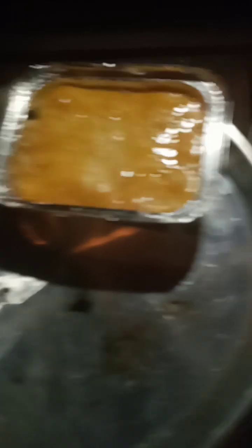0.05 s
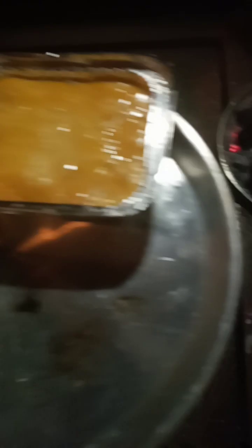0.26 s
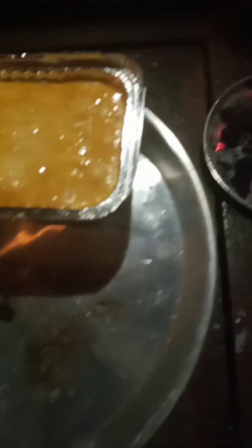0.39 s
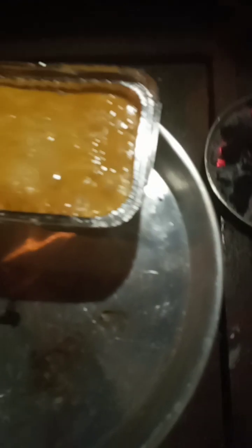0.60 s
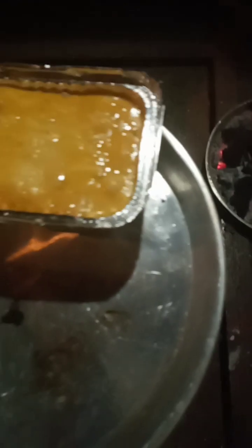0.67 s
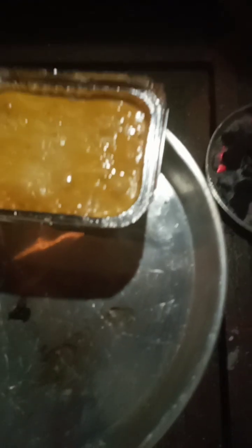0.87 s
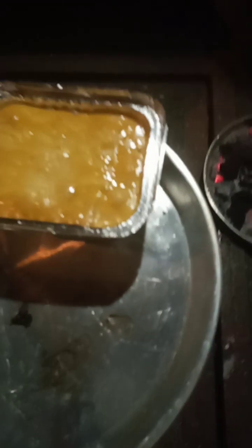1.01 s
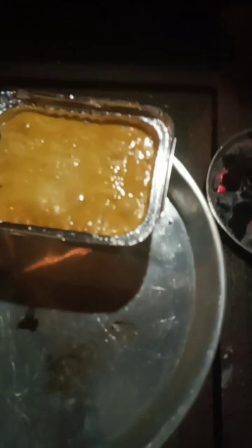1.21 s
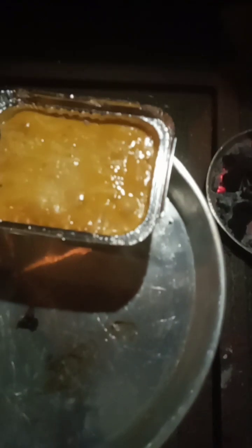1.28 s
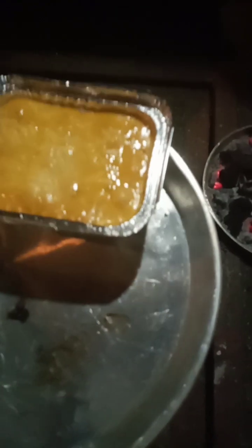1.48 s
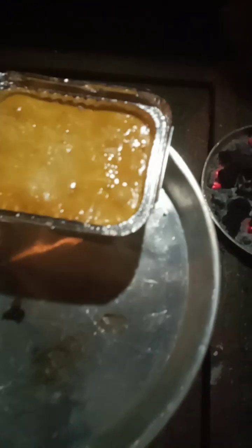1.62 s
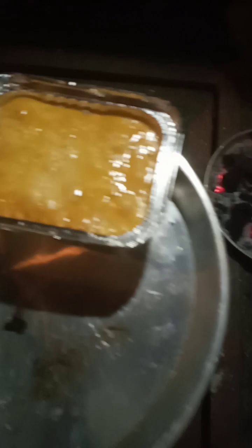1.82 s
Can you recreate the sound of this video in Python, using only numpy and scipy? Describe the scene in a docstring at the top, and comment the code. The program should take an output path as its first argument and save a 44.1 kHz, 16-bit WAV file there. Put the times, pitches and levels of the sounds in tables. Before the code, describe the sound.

Close up in a quiet room, a metal utensil clinks, rings and settles with a thud on a metal tray. Tiny foil ticks follow, then a damped double clack on the tray and faint squeaks over a low rumble.

```python
"""Utensil dropped on a steel tray.

A metal utensil clinks, lands with a thud and chatters to rest; each blow feeds its ringing modes.
Two damped knocks on the tray follow, a duller clack made of decaying noise bands. A foil dish ticks,
slides and rustles. Faint squeaks and hums sound over the low rumble of a quiet room."""
import sys
import numpy as np
from scipy import signal
from scipy.fft import rfft, irfft
from scipy.io import wavfile

SR = 44100
rng = np.random.default_rng(int(sys.argv[2]) if len(sys.argv) > 2 else 0)


def wrap_up_sound(samples):
    """Save the sound to the file named by the first command line argument, as 16-bit audio."""
    columns = np.atleast_2d(samples).T
    # keep every value between -1 and 1, then stretch to whole-number steps
    tamed = np.clip(columns, -1, 1)
    steps = np.round(tamed * 32767).astype(np.int16)
    wavfile.write(sys.argv[1], SR, steps)


N = 81585
T = np.arange(N) / SR
HZ = np.maximum(np.fft.rfftfreq(N, 1 / SR), 1)

# Utensil strikes. Each row: start in seconds, ring level in dB, clash level in dB.
STRIKES = [(.2062, -5.5, -22), (.2585, -5.5, -23.5), (.297, -5.5, -25.5), (.318, -28, -51)]
# Ringing modes of the metal. Each row: frequency in Hz, relative level in dB.
METAL_MODES = [(1519, -13), (1908, 1), (1998, -12), (2094, -4), (2196, -3), (2665, -15), (3068, -4),
               (3164, -13), (3597, -7), (4274, -8), (4393, -12), (4597, -13), (5098, -15), (5216, -15),
               (5556, -14), (5884, -17), (6035, -17), (6294, -4), (6950, -14), (7525, -12), (7962, -10),
               (8263, -20), (9030, -22), (10130, -25), (10865, -23), (15380, -15)]
# Weight landing on the tray. Each row: start in seconds, level in dB.
THUDS = [(0.316, -17.5), (0.347, -32.5), (0.38, -32.5), (1.305, -54)]
# Tray knocks. Each row: start in seconds, level in dB, tilt in dB per octave, crack level in dB.
KNOCKS = [(0.8811, -30, -1, -48), (0.9223, -19, 0.5, -26)]
# Foil ticks. Each row: start in seconds, level in dB.
TICKS = [(.058, -58), (.6725, -39), (.7473, -43), (.758, -57), (1.241, -64), (1.513, -55)]
# Faint tones. Each row: start in seconds, length in seconds, pitch in Hz, glide in Hz/s, level in dB.
SQUEAKS = [(1.135, 0.067, 2260, -5, -55.5), (1.377, 0.058, 2386, -2500, -53), (1.4, 0.055, 1547, 5, -59.5),
           (1.458, 0.044, 2166, 5000, -54), (1.461, 0.098, 3290, 5, -61.5)]
HUMS = [(-.06, 0.38, 690, 0, -60.5), (.42, 0.21, 690, 0, -61), (.5, 0.23, 415, 6, -68.5),
        (.99, 0.21, 729, -250, -59.5)]
# Room noise envelope. Each row: time in seconds, level in dB.
ROOM_LEVEL = [(0, -54), (.3, -54), (.62, -54), (.8, -55.5), (1.08, -52.5), (1.3, -52.5), (1.55, -54.5),
              (1.72, -52.5), (1.85, -52.5)]

# Noise spectra of the sources. Each row: frequency in Hz, relative density in dB.
CLASH_SPECTRUM = [(150, -35), (380, 5.5), (700, -14), (1000, 5), (1600, -0.5), (2400, 4.5), (3200, 0.5),
                  (4200, 4.5), (4900, -1), (6100, 9), (8000, -1), (9800, -9.5), (13700, -18.5), (14500, -2),
                  (15400, -0.5), (16500, -28)]
THUD_SPECTRUM = [(60, -26), (150, -15.5), (250, -10.5), (340, 4.5), (410, 2), (490, 3), (660, 3.5),
                 (760, -10), (860, 3.5), (1100, -10.5), (1400, -2.5), (2400, -11), (4000, -29.5)]
KNOCK_SPECTRUM = [(100, -41.5), (330, -14.5), (550, -23), (950, -13.5), (1200, 0), (1400, 3.5), (1530, 3),
                  (1670, 2), (1820, -9), (1940, 0.5), (2050, -11.5), (2190, 3), (2600, -9.5), (3400, -16.5),
                  (4600, -13.5), (5800, -8.5), (6500, -10.5), (7200, -14.5), (8300, -28.5), (11500, -27.5),
                  (13600, -43), (15100, -18), (16500, -47)]
TICK_SPECTRUM = [(1500, -16), (3500, -27), (5000, -16), (7200, -4), (9000, -30), (11800, 4.5), (13500, -16),
                 (15300, 1), (16500, -7.5)]
RUSTLE_SPECTRUM = [(500, -18), (4000, -2), (7000, 1), (10000, -0.5), (13500, -11), (15300, 2), (16500, -17)]
SLIDE_SPECTRUM = [(800, -12), (2400, 8), (3500, -8), (7000, 3), (9000, -24), (15000, -22)]
ROOM_SPECTRUM = [(25, -22), (45, -18), (62, -9.5), (76, 3.5), (92, -7.5), (118, -1.5), (150, -12.5),
                 (240, -12.5), (330, -17), (520, -23), (850, -21), (1200, -23.5), (2200, -21),
                 (2700, -22.5), (4300, -32.5), (5800, -32), (7000, -24.5), (8500, -45.5), (13000, -46),
                 (15300, -39), (16500, -25)]
# Stereo balance. Each row: frequency in Hz, left minus right in dB.
HIT_BALANCE = [(100, 13.5), (700, 2), (1300, 10.5), (2300, 12), (3300, 15.5), (4400, -8), (6500, 7.5),
               (9000, 0), (15000, 0.5)]
ROOM_BALANCE = [(60, 3), (200, 3.8), (700, 3.4), (1300, 8.4), (2300, 14.2), (4400, 1.5), (8000, 9.1),
                (15000, 2.2)]
# Likeness of left and right. Each row: frequency in Hz, coherence from 0 to 1.
COHERENCE = [(80, 1), (400, 0.72), (1500, 0.33), (8000, 0.75)]

CHATTER_START_S, CHATTER_GAP_S, CHATTER_FADE_DB_PER_S = 0.33, 0.015, 110
CHATTER_RING_DB, CHATTER_CLASH_DB = -21, -29.5
REST_S, CHOKE_DB_PER_S = 0.489, 155
RING_DB, RING_T60_S = -27.5, 0.51   # at 2 kHz
RING_TILT_DB_PER_OCT, RING_T60_SLOPE = 0.72, 0.14
LEFT_LAG_S = 0.0011057


def utensil():
    """Strikes and chatter excite the metal; the sound is choked once it lies still."""
    blows = STRIKES + chatter()
    tones = 0
    for hz, mode_db in METAL_MODES:
        octaves = np.log2(hz / 2000)
        level_db = RING_DB + mode_db + RING_TILT_DB_PER_OCT * octaves
        t60_s = RING_T60_S * 2 ** (-RING_T60_SLOPE * octaves)
        tones = tones + ring([(s, db + level_db) for s, db, _ in blows], hz, t60_s)
    clashes = [(s, db) for s, _, db in blows]
    shimmer = dense_modes(noise(CLASH_SPECTRUM, comb=mode_comb()), clashes, t60_s=0.16, slope=0.055)
    snap = from_db(-7) * noise(CLASH_SPECTRUM) * decay(clashes, t60_s=0.085)
    choke = from_db(-CHOKE_DB_PER_S * np.maximum(T - REST_S, 0))
    return (tones + shimmer + snap + crack(clashes)) * choke


def chatter():
    """Quick, ever weaker bounces until rest; rows as in STRIKES."""
    starts_s = CHATTER_START_S + CHATTER_GAP_S * (np.arange(24) + rng.uniform(0.13, 0.33, size=24))
    fades_db = CHATTER_FADE_DB_PER_S * (starts_s - CHATTER_START_S)
    return [(s, CHATTER_RING_DB - db, CHATTER_CLASH_DB - db)
            for s, db in zip(starts_s, fades_db) if s < REST_S]


def ring(hits, hz, t60_s, max_split_hz=18.9, twin_db=0.5):
    """One mode beating with a near-equal twin; separate phases in each ear."""
    phase, twin_phase = rng.uniform(0, 2 * np.pi, (2, 2, 1))
    twin_hz = hz + max_split_hz * rng.uniform(0.505, 1) * rng.choice([-1, 1])
    mode = np.sin(2 * np.pi * hz * T + phase)
    twin = from_db(twin_db) * np.sin(2 * np.pi * twin_hz * T + twin_phase)
    lean = from_db(np.interp(hz, HZ, at_hz(HIT_BALANCE)) / 2)
    return (mode + twin) * decay(hits, t60_s) * [[lean], [1 / lean]]


def mode_comb(count=170, gap_hz=95, width_hz=4, spread_db=5):
    """Frequency response of narrow modes, uneven in spacing and strength."""
    centres_hz = gap_hz * (np.arange(count) + rng.random(count))
    peaks = from_db(spread_db * np.clip(rng.standard_normal(count), -2, 1))
    power = sum(peak ** 2 / (1 + ((HZ - hz) / (width_hz / 2)) ** 2)
                for hz, peak in zip(centres_hz, peaks))
    return np.sqrt(power)


def dense_modes(source, hits, t60_s, slope, attack_cycles=0.68):
    """Struck modes as noise bands; higher octaves rise and die faster. t60_s holds at 2 kHz."""
    spectrum, out = rfft(source), 0
    centres_hz = 2000 * 2. ** np.arange(-5, 4)
    for hz, weights in zip(centres_hz, np.eye(len(centres_hz))):
        band = irfft(spectrum * np.interp(np.log(HZ), np.log(centres_hz), weights), N)
        envelope = decay(hits, t60_s * (2000 / hz) ** slope)
        attack_pole = np.exp(-hz / (attack_cycles * SR))
        out = out + band * signal.lfilter([1 - attack_pole], [1, -attack_pole], envelope)
    return out


def crack(hits, left_db=-12, right_db=1):
    """Bright first instant of a hard contact, shifted to the right."""
    highpass = signal.butter(2, 3500, "high", fs=SR, output="sos")
    treble = signal.sosfilt(highpass, noise(CLASH_SPECTRUM))
    early_hits = [(s - LEFT_LAG_S / 2, db) for s, db in hits]
    return treble * from_db([[left_db], [right_db]]) * decay(early_hits, t60_s=0.054)


def tray(tail_db=-23):
    """Thuds of landing weight, then two damped knocks with a room tail."""
    body = dense_modes(noise(THUD_SPECTRUM), THUDS, t60_s=0.13, slope=0.074)
    for s, db, tilt, _ in KNOCKS:
        clack = noise(KNOCK_SPECTRUM, tilt_db_per_oct=tilt)
        body = body + dense_modes(clack, [(s, db)], t60_s=0.18, slope=0.16)
    tail_envelope = decay([(s, db + tail_db) for s, db, _, _ in KNOCKS], t60_s=0.52)
    tail = noise(KNOCK_SPECTRUM, tilt_db_per_oct=-5) * tail_envelope
    return body + tail + crack([(s, db) for s, _, _, db in KNOCKS])


def foil():
    """Tiny bright snaps with a short reflection; one soft rustle."""
    snaps = noise(TICK_SPECTRUM) * decay(TICKS, t60_s=0.024)
    reflection = from_db(-15) * noise(TICK_SPECTRUM) * decay(TICKS, t60_s=0.086)
    rustle = from_db(-59) * noise(RUSTLE_SPECTRUM) * swell(start_s=1.243, length_s=0.035)
    return snaps + reflection + rustle


def dish_slide():
    """The dish slides a little, starting just before the knocks."""
    return from_db(-56) * noise(SLIDE_SPECTRUM) * swell(start_s=0.766, length_s=0.24)


def faint_tones(rows, half_width_hz, left_db=4, right_db=-6):
    """Squeaks or hums: narrow noise bands, steady or gliding, that swell and fade on the left."""
    lowpass = signal.butter(2, half_width_hz, fs=SR, output="sos")
    out = 0
    for start_s, length_s, hz, glide_hz_per_s, db in rows:
        real, imag = signal.sosfilt(lowpass, rng.standard_normal((2, 2, N + SR)))[..., SR:]
        pitch_hz = hz + glide_hz_per_s * np.clip(T - start_s, 0, length_s)
        phase = 2 * np.pi * np.cumsum(pitch_hz) / SR
        tone = (real * np.cos(phase) + imag * np.sin(phase)) / real.std()
        out = out + from_db(db) * tone * swell(start_s, length_s)
    return out * from_db([[left_db], [right_db]])


def room_noise():
    """Low rumble and faint hiss, drifting in level."""
    level_db = np.interp(T, *np.transpose(ROOM_LEVEL))
    return from_db(level_db) * noise(ROOM_SPECTRUM, ROOM_BALANCE)


def noise(spectrum, balance=HIT_BALANCE, tilt_db_per_oct=0, comb=1):
    """Coloured stereo noise, rms 1, partly coherent, later on the left."""
    shared, own = rfft(rng.standard_normal((2, N)))
    coherence = at_hz(COHERENCE)
    lean = from_db(at_hz(balance) / 2)
    lag = np.exp(-2j * np.pi * HZ * LEFT_LAG_S)
    left = (coherence * shared + np.sqrt(1 - coherence ** 2) * own) * lag
    colour = comb * from_db(at_hz(spectrum) + tilt_db_per_oct * np.log2(HZ))
    stereo = irfft(np.array([left * lean, shared / lean]) * colour, N)
    return stereo / np.sqrt(np.mean(stereo ** 2))


def decay(hits, t60_s):
    """Envelope of hits (start in seconds, level in dB) whose energies add and die away."""
    energy = np.zeros(N)
    for s, db in hits:
        energy[int(max(s, 0) * SR)] += from_db(db) ** 2
    kept_per_sample = from_db(-60 / (t60_s * SR)) ** 2
    return np.sqrt(signal.lfilter([1], [1, -kept_per_sample], energy + 1e-20))


def swell(start_s, length_s):
    """Quick rise, slower fade."""
    return np.sin(np.pi * np.sqrt(np.clip((T - start_s) / length_s, 0, 1)))


def at_hz(points):
    """Table interpolated over log frequency."""
    hz, value = np.transpose(points)
    return np.interp(np.log(HZ), np.log(hz), value)


def from_db(db):
    """Decibels to gain."""
    return 10 ** (np.asarray(db) / 20)


def scene():
    """All sources over the room noise."""
    room = room_noise()
    slide = dish_slide()
    contacts = utensil() + tray() + foil()
    squeaks = faint_tones(SQUEAKS, half_width_hz=110)
    hums = faint_tones(HUMS, half_width_hz=16)
    return contacts + slide + squeaks + hums + room


def record(dry):
    """Steep low-pass at 16 kHz."""
    return signal.sosfilt(signal.ellip(10, 0.2, 70, 16000, fs=SR, output="sos"), dry)


dry = scene()
out = record(dry)
wrap_up_sound(out)
```